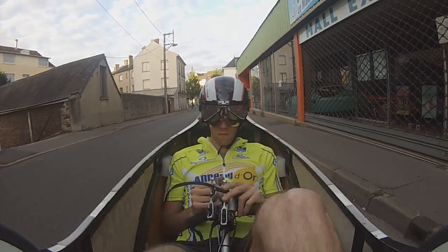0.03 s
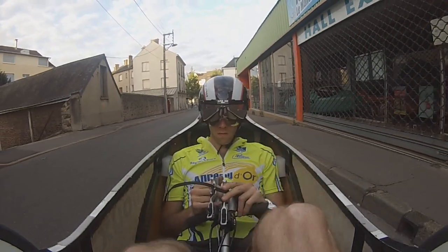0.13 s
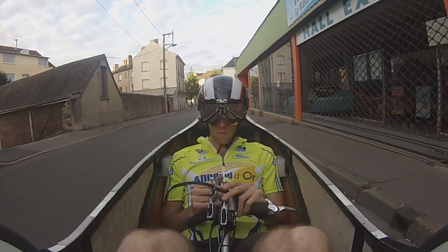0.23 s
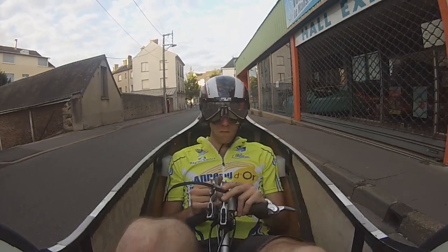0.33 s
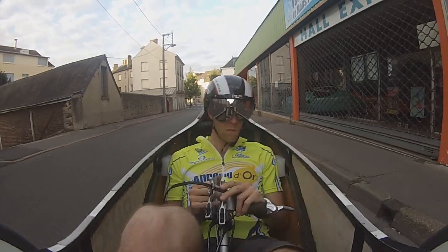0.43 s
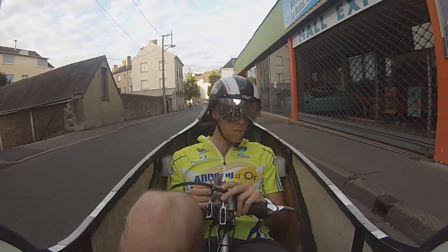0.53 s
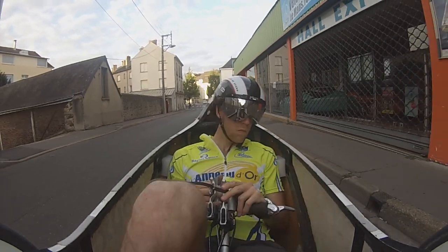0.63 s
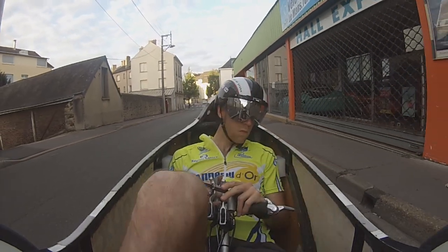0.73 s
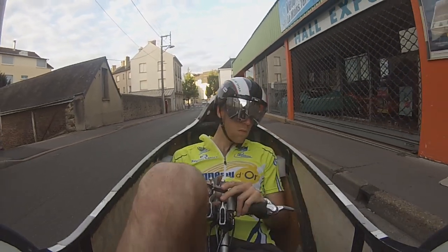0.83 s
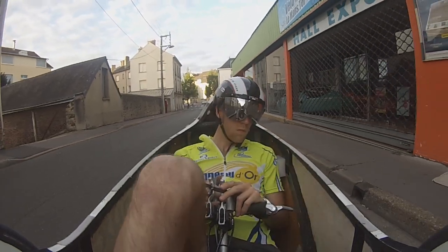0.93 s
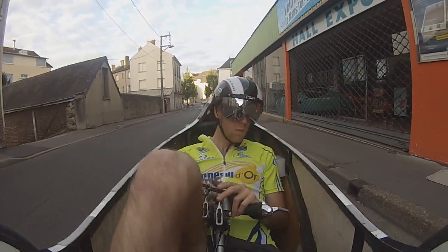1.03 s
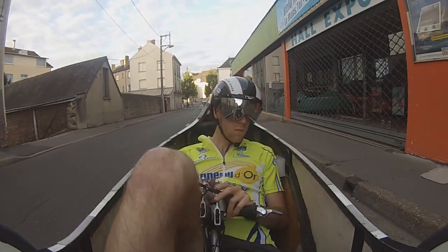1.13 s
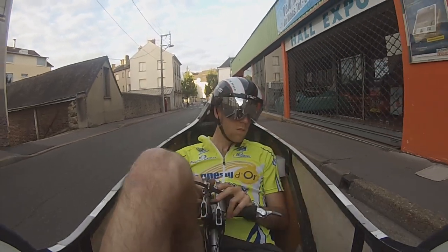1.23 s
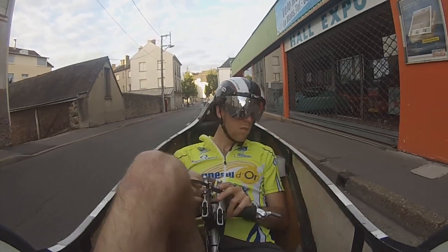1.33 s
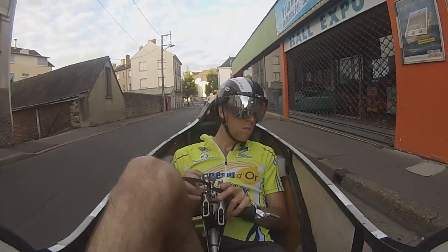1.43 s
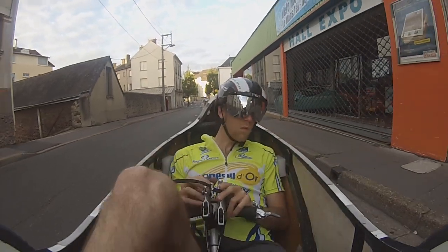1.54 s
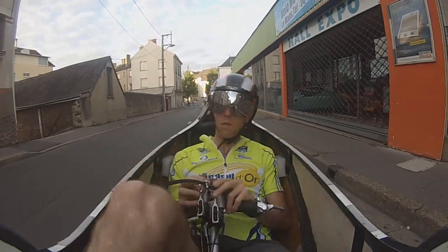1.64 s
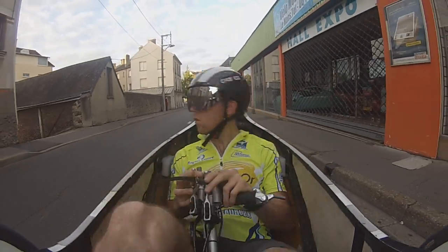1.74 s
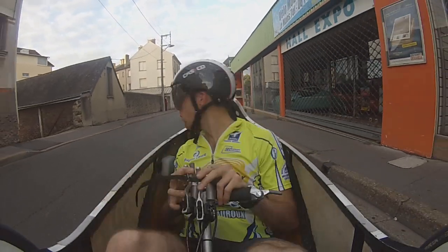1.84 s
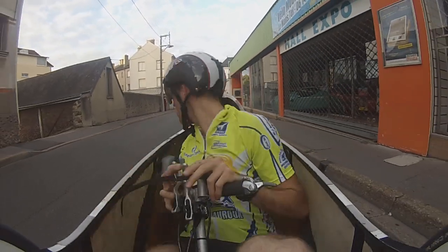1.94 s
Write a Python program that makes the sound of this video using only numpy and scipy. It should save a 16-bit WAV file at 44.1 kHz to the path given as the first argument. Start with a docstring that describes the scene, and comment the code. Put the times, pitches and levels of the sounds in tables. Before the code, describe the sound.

Pedal vehicle's hollow shell knocks loudly, booming and rattling over a low, slow tyre rumble

```python
"""Velomobile rolling along a street

Heard from a camera fixed to the hollow shell, it rolls slowly on rumbling, hissing tyres: coloured noise. The
body shudders on its wheels, a low wandering sine; loose parts tick, some knocks rebound lightly, and a hard
fitting clacks. Six knocks thump, boom in the shell modes and rattle the fittings with noise bursts. The
camera's limiter ducks on the highest peaks and recovers slowly."""
import sys
import numpy as np
from scipy import signal
from scipy.fft import rfft, irfft
from scipy.io import wavfile
from scipy.ndimage import uniform_filter1d, minimum_filter1d

SR = 44100
rng = np.random.default_rng(int(sys.argv[2]) if len(sys.argv) > 2 else 0)


def materialize(psi):
    """Save the field psi as 16-bit PCM at rate SR to the path in sys.argv[1].

    A 1-D psi becomes a single channel; in a 2-D psi each row is a channel.
    """
    bounded = np.clip(np.atleast_2d(psi).T, -1, 1)
    quanta = np.round(bounded * 32767).astype(np.int16)
    wavfile.write(sys.argv[1], SR, quanta)


N = 88200
T = np.arange(N) / SR
ATTACK_S, SHELL_RISE_S = 0.0008, 0.0016  # time constants of the onsets: small parts, shell


def undb(db):
    """Decibels to gain."""
    return 10 ** (np.asarray(db) / 20)


def curve(table, axis):
    """One column of a table, joined by straight lines in time."""
    rows = np.array(table)
    return np.interp(T, rows[:, 0], rows[:, axis])


def gains(colour):
    """A colour as a gain for every frequency, its points joined in dB over log frequency."""
    hz, db = np.array(colour).T
    f = np.maximum(np.arange(N // 2 + 1) * SR / N, 1)
    return undb(np.interp(np.log(f), np.log(hz), db, left=-120, right=-120))


def noise(colour):
    """Random-phase noise of the given colour at unit rms."""
    phase = 2 * np.pi * rng.random(N // 2 + 1)
    x = irfft(gains(colour) * np.exp(1j * phase), N)
    return x / x.std()


def walk(rate_hz):
    """Slow random wandering of unit spread: random steps, smoothed over one step."""
    step = int(SR / rate_hz)
    levels = np.repeat(rng.standard_normal(N // step + 1), step)
    x = uniform_filter1d(levels, step)[:N]
    return x / x.std()


def add(out, start_s, x):
    """Mix a sound in from its start time."""
    i = int(max(start_s, 0) * SR)
    out[i:i + len(x)] += x[:N - i]


def onset(time_constant_s):
    """Rounded attack, rising exponentially towards 1."""
    return 1 - np.exp(-T / time_constant_s)


def fade(t60):
    """Exponential decay, 60 dB down after t60 seconds."""
    return np.exp(-np.log(1000) * T / t60)


def burst(colour, attack_s, t60, tail_db, tail_t60):
    """Dense resonances: a quick rise, a fast decay and a weaker tail in the cabin."""
    decay = fade(t60) + undb(tail_db) * fade(tail_t60)
    return noise(colour) * onset(attack_s) * decay


def click(colour):
    """One clean impact of unit energy, ringing only as long as its colour demands (minimum phase)."""
    gain = gains(colour)
    cepstrum = irfft(np.log(gain + gain.max() / 300), N)  # small floor keeps the log in range
    causal = 2 * cepstrum[:N // 2]
    x = irfft(np.exp(rfft(causal, N)), N)
    return x / np.linalg.norm(x)


def ring(modes, contact_hz):
    """Struck modes, neighbours in opposite sense; a soft contact spares the high ones."""
    out = np.zeros(N)
    for k, (hz, db, t60) in enumerate(modes):
        sense = (-1) ** (k + 1)
        softness = np.hypot(1, (hz / contact_hz) ** 2)
        out += sense * undb(db) / softness * fade(t60) * np.sin(2 * np.pi * hz * T)
    return out


# shudder of the body on its wheels: t/s, rms level/dB, f/Hz
BODY_SHUDDER = [(0.0, -34, 29.2), (0.19, -28, 25.6), (0.30, -31.5, 31.1), (0.44, -35.5, 31.1),
                (0.58, -24.5, 31.53), (0.76, -42, 36.83), (0.98, -23.5, 32.64), (1.05, -44, 30),
                (1.15, -18.5, 27.7), (1.27, -28, 25), (1.42, -37.5, 25.08), (1.5, -30, 28.5),
                (1.71, -22.5, 27.85), (1.80, -38, 31.25), (1.9, -31.5, 32.53), (2.0, -43, 32)]
# rolling tyres: t/s, rumble level/dB, hiss level/dB
TYRE_LEVELS = [(0, -36, -56), (0.18, -42, -58.5), (0.45, -31.5, -61), (0.78, -34, -61), (0.93, -34.5, -58),
               (1.2, -32, -57.5), (1.45, -38, -58.5), (1.6, -34.5, -57.5), (1.8, -38.5, -57),
               (2.0, -39.5, -55.5)]
# colour of the shell's rumble: f/Hz, level/dB
RUMBLE_COLOUR = [(20, -6), (40, 7.5), (60, -3), (100, 0), (135, 0), (160, -8), (240, -3), (320, -13.5),
                 (400, -19), (490, -17), (600, -35), (760, -29), (900, -53), (1500, -45)]
# colour of the tread's hiss: f/Hz, level/dB
HISS_COLOUR = [(500, 2), (950, -6), (1350, 2), (1480, -2), (1650, 10.5), (1850, -4), (2200, -7),
               (3300, -7.5), (4100, -12.5), (4950, -9), (5800, -16.5), (7500, -18), (9400, -14),
               (11000, -24), (13300, -23.5), (15000, -35.5)]
SHUDDER_WAVER_DB, RUMBLE_WAVER_DB, HISS_WAVER_DB = 1.8, 1.5, 1.4  # rms spread of each level


def rolling():
    """Tyres on rough asphalt: the body shudders, the shell rumbles and the tread hisses."""
    shudder_level = undb(curve(BODY_SHUDDER, axis=1) + SHUDDER_WAVER_DB * walk(32))
    shudder_phase = 2 * np.pi * np.cumsum(curve(BODY_SHUDDER, axis=2)) / SR
    shudder = np.sqrt(2) * shudder_level * np.sin(shudder_phase)  # root 2: sine of unit rms
    rumble_level = undb(curve(TYRE_LEVELS, axis=1) + RUMBLE_WAVER_DB * walk(30.09))
    hiss_level = undb(curve(TYRE_LEVELS, axis=2) + HISS_WAVER_DB * walk(45))
    return shudder + rumble_level * noise(RUMBLE_COLOUR) + hiss_level * noise(HISS_COLOUR)


# loose parts tapping the shell, and light rebounds of the knocks: t/s, thud level/dB, rattle level/dB, snap
# level/dB
LOOSE_TICKS = [(0.0892, -52, -48, -56), (0.148, -37.5, -48, -45), (0.168, -46, -45.5, -48.5),
               (0.323, -26, -71.5, -81), (0.7, -34.5, -43, -66), (1.342, -27.5, -60, -68),
               (1.71, -33.5, -41, -52), (1.7556, -40.5, -43.5, -24.5), (1.815, -44, -48, -53),
               (1.895, -34.5, -51, -46)]
# shell modes, also boomed by the knocks: f/Hz, level/dB, t60/s
SHELL_MODES = [(136.9, 1.5, 0.26), (181.5, -1.5, 0.26), (234.6, -2.5, 0.22), (268.2, -5.5, 0.3),
               (312.8, -7, 0.17), (376.5, -5.5, 0.076), (490.2, -8, 0.21), (735.6, -11, 0.087)]
# modes of a hard fitting, also struck by the clacks: f/Hz, level/dB, t60/s
FITTING_MODES = [(1648, -2, .045), (1748, -6, .05), (1935, -14, .12), (3250, -24, .05)]
# colour of panel clatter, also in the knocks: f/Hz, level/dB
CLATTER_COLOUR = [(90, -24), (140, -14.5), (300, 9), (420, -4.5), (510, 3), (620, -14), (780, -18.5),
                  (920, -36.5), (1500, -42.5)]
# colour of fitting rattle, also in the knocks: f/Hz, level/dB
RATTLE_COLOUR = [(700, 12.5), (1000, -9.5), (1250, 1), (1450, -1.5), (1680, 5), (1900, -2), (2200, -14.5),
                 (2600, -9), (3500, -27.5), (5200, -38), (7000, -44.5), (14000, -53)]
# bright snap of small hard parts, also in the clacks: f/Hz, level/dB
SNAP_COLOUR = [(1400, 2.5), (2000, 6), (2500, -0.5), (3300, 4.5), (3800, -7), (4600, 7.5), (5200, 8),
               (5800, -14), (6600, -8.5), (9000, -23), (14000, -34.5)]
TICK_CONTACT_HZ, TICK_CLATTER_DB = 420, -1.5  # clatter relative to the thud level


def ticks():
    """Loose parts tap the shell lightly and set the fitting ringing; a few taps are light rebounds just after a
    knock."""
    out = np.zeros(N)
    thud = ring(SHELL_MODES, TICK_CONTACT_HZ) * onset(SHELL_RISE_S)
    fitting = ring(FITTING_MODES, np.inf)
    for start, thud_db, rattle_db, snap_db in LOOSE_TICKS:
        clatter = undb(TICK_CLATTER_DB) * noise(CLATTER_COLOUR) * onset(SHELL_RISE_S) * fade(0.08)
        rattle = burst(RATTLE_COLOUR, ATTACK_S, t60=0.057, tail_db=-30.5, tail_t60=0.17)
        snap = burst(SNAP_COLOUR, ATTACK_S, t60=0.0084, tail_db=-23.5, tail_t60=0.085)
        add(out, start, undb(thud_db) * (thud + clatter))
        add(out, start, undb(rattle_db) * (fitting + rattle))
        add(out, start, undb(snap_db) * snap)
    return out


# clacks of the hard fitting: t/s, ring level/dB, chatter level/dB
FITTING_CLACKS = [(0.8358, -19, -42.5), (0.8505, -24, -49), (1.075, -27.5, -53)]
SCRAPE_S, SCRAPE_DB = 0.814, -46  # start and level of the scrape


def clacks():
    """A hard fitting scrapes briefly, then strikes and rebounds, chattering in its seat."""
    out = np.zeros(N)
    scrape = burst(SNAP_COLOUR, attack_s=0.0025, t60=0.061, tail_db=-38, tail_t60=0.13)
    add(out, SCRAPE_S, undb(SCRAPE_DB) * scrape)
    fitting = ring(FITTING_MODES, np.inf)
    for start, ring_db, chatter_db in FITTING_CLACKS:
        chatter = burst(SNAP_COLOUR, ATTACK_S, t60=0.076, tail_db=-20, tail_t60=0.13)
        add(out, start, undb(ring_db) * fitting + undb(chatter_db) * chatter)
    return out


THUMP_RISE, THUMP_SETTLE_SHARE = 0.61, 0.3  # starting pitch excess (ratio), settling time per hold time
THUMP_ATTACK_S, THUMP_T60_S = 0.0018, 0.027


def thump(hz, hold_s):
    """The struck panel flexes for a few cycles, its pitch sagging to hz as it relaxes."""
    pitch = hz * (1 + THUMP_RISE * np.exp(-T / (THUMP_SETTLE_SHARE * hold_s)))
    release = np.exp(-np.log(1000) * np.maximum(T - hold_s, 0) / THUMP_T60_S)
    return -onset(THUMP_ATTACK_S) * release * np.sin(2 * np.pi * np.cumsum(pitch) / SR)


# colour of the sharp crack: f/Hz, level/dB
CRACK_COLOUR = [(900, 12.5), (2100, 10.5), (2700, 6.5), (3700, 0.5), (4600, 9.5), (5150, 4.5), (5700, -12),
                (6800, -11.5), (7500, -13), (9000, -16), (11000, -26), (15000, -44.5)]
# colour of its echo in the cabin: f/Hz, level/dB
CABIN_COLOUR = [(2300, -1), (3300, 2.5), (6700, -7.5), (13000, -28.5)]
CRACK_CLICK_DB, CRACK_GRIT_DB = 12, -1  # both relative to the crack level
CABIN_DB, CABIN_RISE_S, CABIN_T60_S = -14.5, 0.022, 0.11  # echo, relative to the crack level


def crack():
    """A clean click with gritty noise, echoing in the cabin with a slower swell."""
    impact = undb(CRACK_CLICK_DB) * click(CRACK_COLOUR)
    grit = undb(CRACK_GRIT_DB) * noise(CRACK_COLOUR) * onset(ATTACK_S) * fade(0.029)
    echo = undb(CABIN_DB) * noise(CABIN_COLOUR) * onset(CABIN_RISE_S) * fade(CABIN_T60_S)
    return impact + grit + echo


# knocks: t/s, thump level/dB, thump f/Hz, thump hold/s, shell boom level/dB, panel clatter level/dB,
# fitting rattle level/dB, sharp crack level/dB, lag of the crack/s, metal ring level/dB
SHELL_KNOCKS = [(0.2325, 2.5, 214.4, 0.02, -5, -17, -20.5, -21.5, 0.0033, -65),
                (0.436, -5, 262, 0.011, -13.5, -12.5, -27, -29.5, 0.0035, -77),
                (0.5485, -3, 195, 0.01, -9.5, -9, -23, -20, 0.0012, -64.5),
                (0.8341, -16, 199.8, 0.034, -15, -22, -23, -53, 0.002, -49.5),
                (1.0691, -11.5, 186.5, 0.027, -13.5, -19, -24.5, -53.5, 0.001934, -32.5),
                (1.3278, -20.5, 181.5, 0.025, -27.5, -27.5, -49.5, -65, 0.0021, -54)]
# modes of the metal drive parts: f/Hz, level/dB, t60/s
METAL_MODES = [(1230, -3, .09), (1270, -7, .22), (1427, -11, .2), (1728, -12, .29), (1809, -1, .13),
               (1857, -8, .15), (2347, -10, .18), (2444, -24, .4), (5626, -36, .4), (8161, -32, .34)]
KNOCK_CONTACT_HZ = 364


def knocks():
    """Each knock flexes a panel, booms in the shell, shakes the fittings, rings the metal and cracks."""
    out = np.zeros(N)
    metal = ring(METAL_MODES, np.inf)
    shell = ring(SHELL_MODES, KNOCK_CONTACT_HZ) * onset(SHELL_RISE_S)
    for (start, thump_db, thump_hz, hold_s, boom_db, clatter_db,
         rattle_db, crack_db, lag_s, metal_db) in SHELL_KNOCKS:
        add(out, start, undb(thump_db) * thump(thump_hz, hold_s))
        add(out, start, undb(boom_db) * shell + undb(metal_db) * metal)
        clatter = burst(CLATTER_COLOUR, ATTACK_S, t60=0.13, tail_db=-12, tail_t60=0.22)
        rattle = burst(RATTLE_COLOUR, ATTACK_S, t60=0.079, tail_db=-21, tail_t60=0.3)
        add(out, start + lag_s / 2, undb(clatter_db) * clatter + undb(rattle_db) * rattle)
        add(out, start + lag_s, undb(crack_db) * crack())
    return out


def scene():
    """Everything reaches the camera through the shell."""
    return (rolling() + ticks() + clacks() + knocks())[None]


LIMIT_DB, RECOVER_DB_PER_S, TOP_HZ = -0.2, 5, 14900


def record(dry):
    """A limiter ducks on the peaks and recovers slowly; the top is cut."""
    over_db = np.maximum(20 * np.log10(np.abs(dry[0]) + 1e-9) - LIMIT_DB, 0)
    recovery_db = RECOVER_DB_PER_S * T
    duck_db = np.maximum.accumulate(over_db + recovery_db) - recovery_db
    # the gain starts falling just ahead of each peak, then is smoothed
    gain = uniform_filter1d(minimum_filter1d(undb(-duck_db), size=200), size=200)
    top_cut = signal.ellip(8, 0.2, 70, TOP_HZ, fs=SR, output="sos")
    return signal.sosfilt(top_cut, dry * gain)


dry = scene()
out = record(dry)
materialize(out)
```